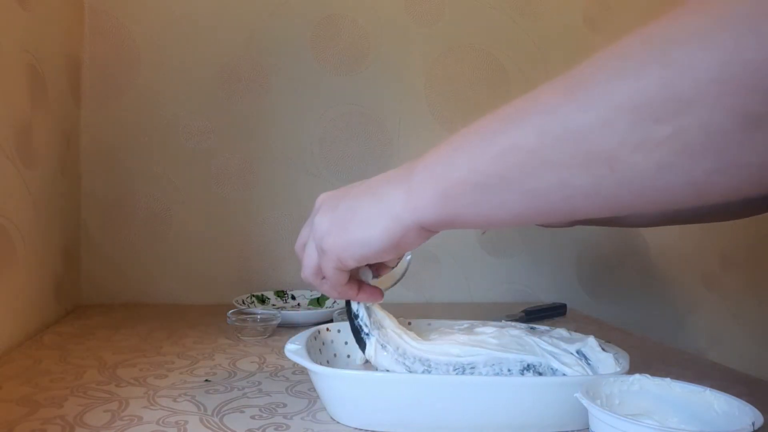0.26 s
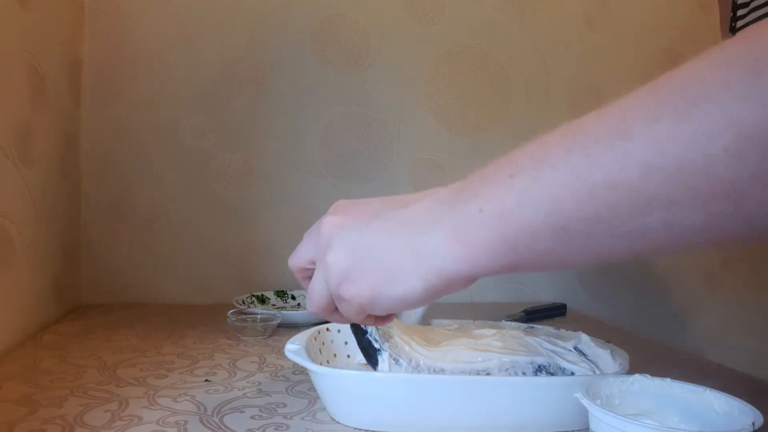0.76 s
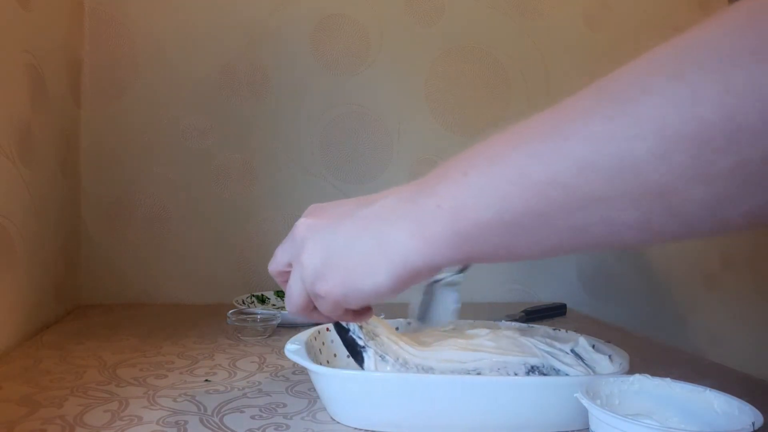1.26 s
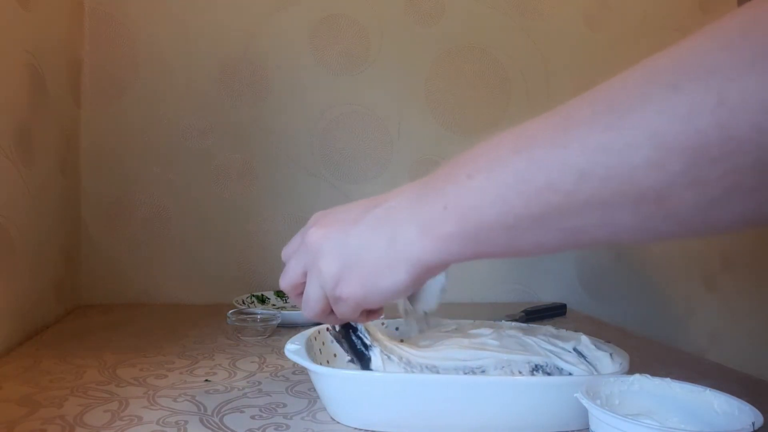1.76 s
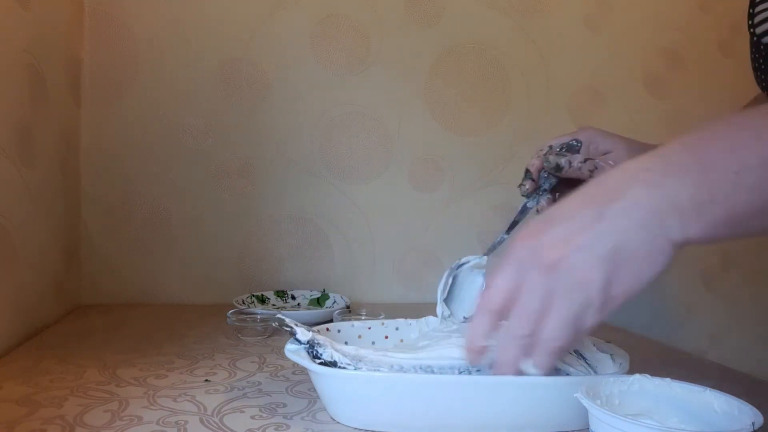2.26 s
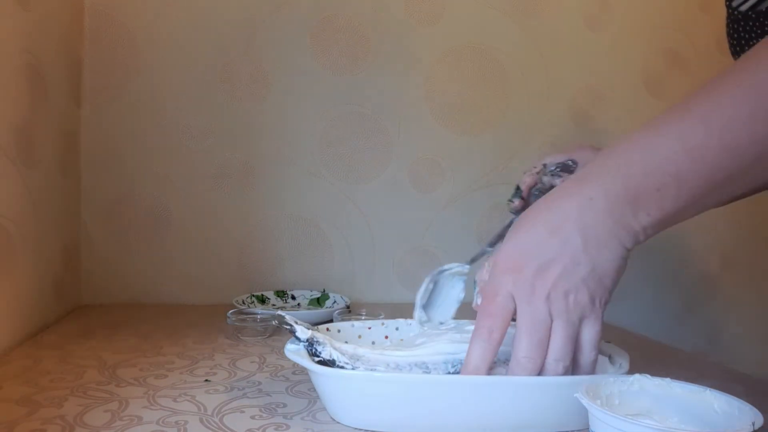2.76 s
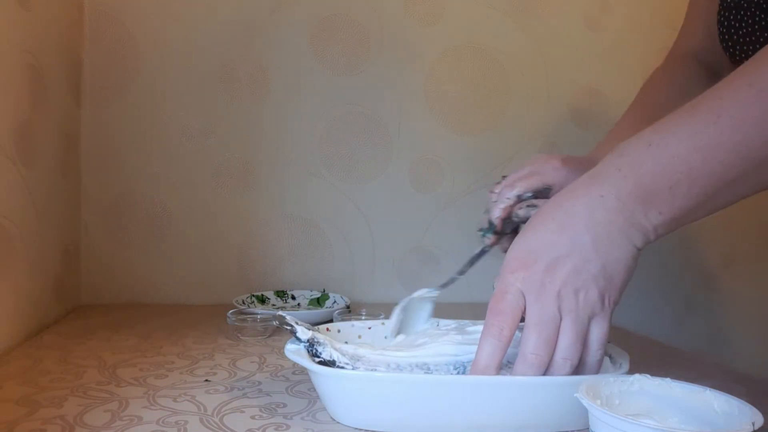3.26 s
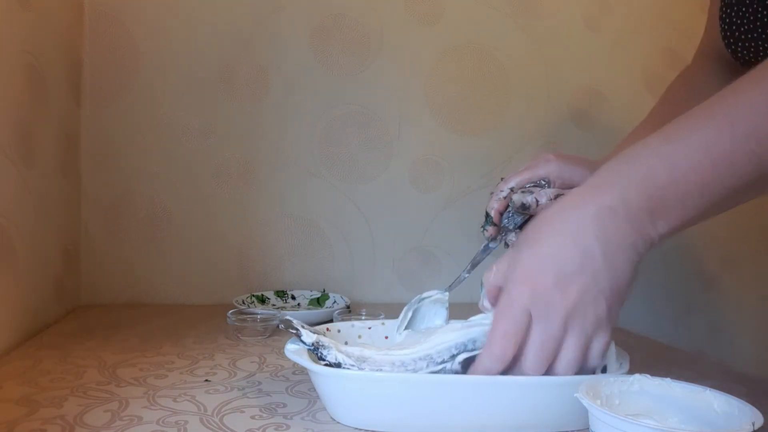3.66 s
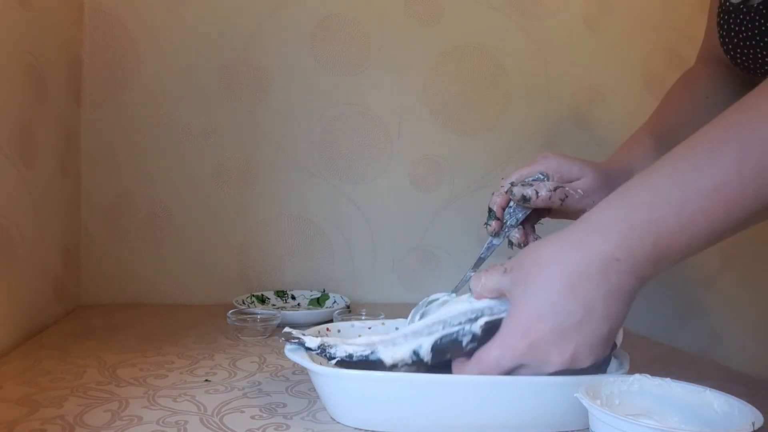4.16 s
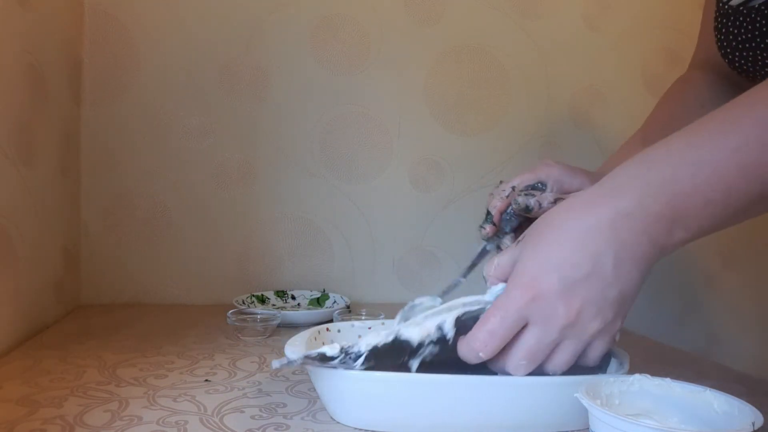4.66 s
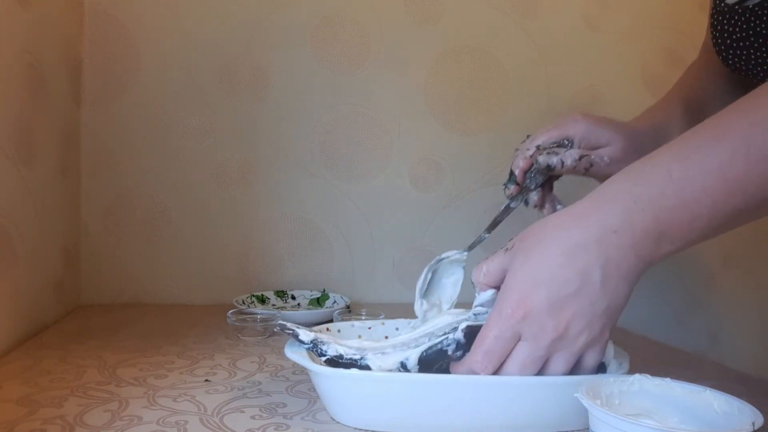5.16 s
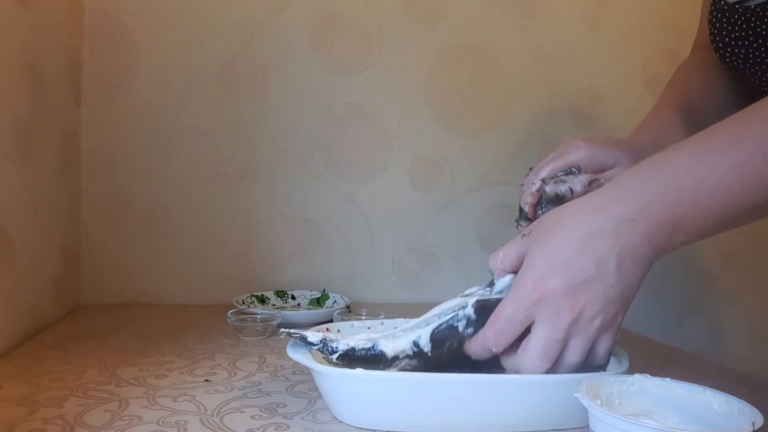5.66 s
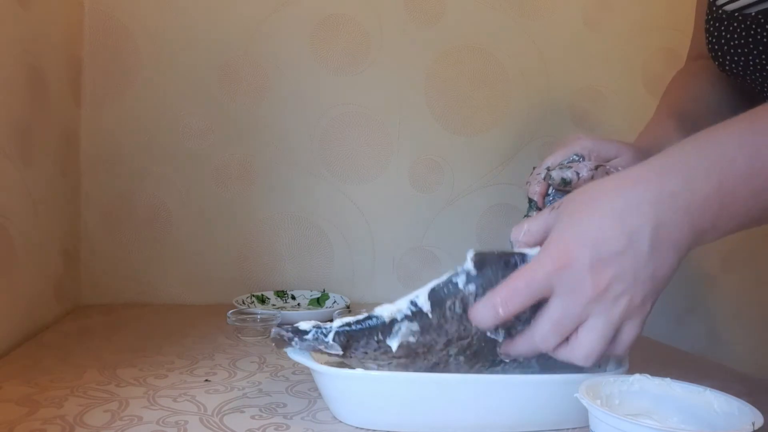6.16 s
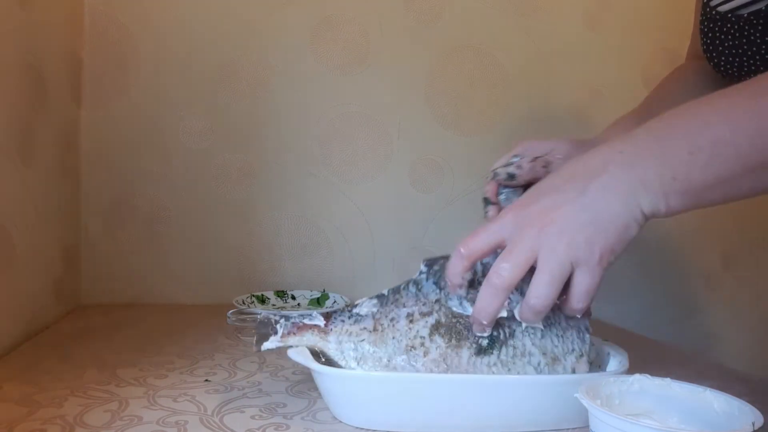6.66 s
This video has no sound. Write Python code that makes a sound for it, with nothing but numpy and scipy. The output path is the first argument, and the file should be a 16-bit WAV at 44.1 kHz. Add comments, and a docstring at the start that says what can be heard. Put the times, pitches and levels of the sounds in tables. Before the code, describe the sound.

Stereo, close microphone on a counter, with short lively room echoes. Quiet fridge hum and a thin whine run throughout. Spoon knocks on thick ceramic come singly with gaps, short and dull-ringing, loudest around the middle and late. Faint sticky smears and soft fleshy bumps fill the gaps, then a brief squeak, a sharp clack, a gritty stick-slip scrape and a final softer knock.

```python
"""Saucing a fish in a ceramic dish

A steel spoon spreads sauce over a fish and knocks the dish: each knock is a tiny blow that sets the dish ringing.
The fish is lifted and turned: soft low thuds, wet smacks made of tiny pops, and a juddering stick-slip scrape.
The spoon squeaks briefly in wavering tones. A small hard-walled kitchen adds echoes to each of these sounds.
Behind it lie shaped noise for the room air and wavering tones for a refrigerator that hums and whines faintly."""
import sys
import numpy as np
from scipy import signal
from scipy.fft import rfft, irfft, next_fast_len
from scipy.io import wavfile
from scipy.ndimage import uniform_filter1d, map_coordinates

SR = 44100
rng = np.random.default_rng(int(sys.argv[2]) if len(sys.argv) > 2 else 0)


def put_to_file(sound):
    """Save the sound as 16-bit audio at rate SR, in the file named by the first command-line argument."""
    columns = np.atleast_2d(sound).T  # one column per channel
    safe = np.clip(columns, -1, 1)
    whole_steps = np.round(safe * 32767)
    wavfile.write(sys.argv[1], SR, whole_steps.astype(np.int16))


N = 304731  # length in samples

# The room
# tone colour of the room air: pitch_hz, level_db
AIR_COLOUR = [(20, -11), (38, -35.5), (50, 0), (120, -5.5), (400, -4.5), (660, -11), (950, -9),
              (1500, -24.5), (2200, -24.5), (2850, -17.5), (3100, -30), (5500, -32.5), (7800, -30.5),
              (8700, -26.5), (10000, -34), (15800, -32)]
# how alike left and right are, in the air and in the echoes: pitch_hz, likeness (1 = identical)
AIR_LIKENESS = [(60, 1), (240, 0.62), (950, -0.037), (3770, -0.093), (15000, -0.12)]
ECHO_LIKENESS = [(100, 1), (300, .75), (700, 0.65), (2000, .15), (8000, 0.26)]
# time for the kitchen's echoes to fall by 60 dB: pitch_hz, decay_s
ECHO_DECAY = [(100, 0.43), (300, 0.47), (700, 0.43), (2000, 0.37), (5000, 0.4), (9000, 0.36), (15000, 0.36)]
# tones of the refrigerator hum: pitch_hz, level_db
HUM_TONES = [(98, -77.5), (146, -71), (199, -75), (247.6, -75), (296, -76), (398.4, -73), (543.7, -77.5),
             (640.6, -84.5), (829, -82.5), (2412, -93.5)]
TOP_HZ = 15800  # nothing above this is kept

# The fish and the sauce
# soft bumps of the fish and hand: start_s, level_db, time_scale_s
SOFT_BUMPS = [(1.422, -49, 0.028), (2.033, -57.5, 0.017), (2.182, -49.5, 0.022), (3.709, -39, 0.02),
              (3.96, -55, 0.071), (5.45, -45.5, 0.058)]
# tone colour of soft flesh: pitch_hz, level_db
FLESH_COLOUR = [(25, -41.5), (45, -15.5), (70, 3.5), (100, -3.5), (140, -3), (300, -8), (600, -17.5),
                (1200, -31.5), (4000, -54.5), (16000, -92)]
# tone colour of the rustling sauce: pitch_hz, level_db
SAUCE_COLOUR = [(290, -34), (500, -11), (549, -16), (676, -16), (832, -6.5), (1160, -7.5), (1950, -18),
                (2330, -10.5), (6000, -42), (7800, -65), (13200, -120)]
# the clearest wet smacks: start_s, level_db, pitch_hz
CLEAR_SMACKS = [(0.658, -72.5, 8040), (1.697, -71, 11000), (1.876, -73, 7200), (2.19, -70, 2020),
                (4.378, -68, 4670), (4.933, -55.5, 1050), (4.964, -72, 9630), (5.783, -65, 6330),
                (6.421, -64.5, 8900)]
SMACK_S, SMACK_OCTAVES = 0.016, 0.45  # time scale and width in pitch of every smack
FAINT_SMACK_DB, FAINT_SMACK_HZ = -81.5, 8000  # middle values of the small smacks that come at random
# slow strokes of the spoon through sauce: start_s, length_s, level_db
SPREAD_STROKES = [(3.92, 0.29, -70.5), (4.39, 0.16, -61.5), (4.58, .3, -67)]
# each stroke sinks in gently, builds up, eases and lifts out
SINK_DB, SINK_S, EASE_DB, LIFT_DB_PER_S = -7, 0.11, 7, 112

# The spoon and the dish
# the spoon's edge catches and squeaks: start_s, level_db, time_scale_s
SPOON_SQUEAKS = [(5.3849, -28.5, 0.0057), (5.431, -42.5, 0.0044)]
# tones of the squeak: pitch_hz, level_db
SPOON_TONES = [(1020, -7.5), (1420, -11.5), (2530, -2), (3700, -23.5)]
# pushes that scrape along the ceramic: start_s, length_s, level_db
SCRAPE_PUSHES = [(5.997, 0.15, -53.5), (6.088, 0.11, -23), (6.201, 0.03, -28.5), (6.357, 0.069, -43.5)]
# each push bites below its full force, builds up, slackens and lets go
BITE_DB, BUILD_S, SLACKEN_DB, LET_GO_DB_PER_S = -9, 0.045, 12, 380
CATCH_DB = 13.5  # the click as the edge catches, over the level of its push
# low push on the counter, relative to each kind of stroke
SCRAPE_RUMBLE_DB, SPREAD_RUMBLE_DB = -27.5, 1
# ringing modes of the dish, and how strongly each kind of contact drives them:
# pitch_hz, width_hz, end_db, wall_db, corner_db, rim_db, floor_db, scrape_db
DISH_MODES = [(124, 54, -26, -10.5, -8, -16.5, -12, -19.5), (280, 120, -29, -14, -5.5, -21.5, -6.5, -19.5),
              (331, 51, -18.5, -4.5, -6, -11.5, -3, -12.5), (441, 41, -12, -0.5, -8, -4.5, -8, -10.5),
              (619, 76, -18.5, -2, -7, -37.5, -13, -33.5), (795, 60, -23, 0, -1.5, -27, -6, -11),
              (942, 120, -10, -7.5, -9.5, -6, -5.5, -5), (1080, 65, -17, -9, -10, -1, -4.5, -27),
              (1197, 110, -15.5, -9.5, -5, -6, -31, -6), (1416, 110, -2, -3, -2.5, -8, -22, -6.5),
              (1609, 110, -8.5, -1, 0.5, -10, -5, 1.5), (1841, 57, -18, 1, -2, -13.5, -6.5, -26),
              (2018, 87, -10.5, 2.5, 3, -12, -5.5, -9.5), (2298, 80, -5.5, -9, -7.5, -9, -26.5, -31.5),
              (2485, 99, -38, -16.5, -12, -14, 0, -7.5), (2730, 250, -15, -10, -6.5, -16.5, -12, -19),
              (3097, 130, -38, -11, -9.5, -38.5, -6.5, -11.5),
              (3390, 150, -29, -26.5, -13, -28.5, -9.5, -26), (3645, 210, -15, -20, -24, -14, -16, -25.5),
              (4235, 260, -23, -21.5, -21, -18.5, -20, -27),
              (4890, 130, -30, -20, -17.5, -46.5, -16.5, -49),
              (5536, 200, -27.5, -16, -33, -52.5, -19, -32), (6020, 600, -26, -46, -31.5, -27, -38, -39),
              (7040, 300, -28.5, -31, -25.5, -19.5, -22, -47), (8160, 1200, -28.5, -52, -30, -31, -34, -37),
              (9850, 550, -37, -34, -52, -38, -36, -48), (12400, 6200, -59, -54, -44.5, -34.5, -37.5, -58)]
# names of the contacts, in the order of the last six columns above: name
CONTACT_NAMES = ["end", "wall", "corner", "rim", "floor", "scrape"]
# one row for each contact name: direct_db (early arrivals against the echoes),
# thud_db (push into the counter, relative to the knock)
CONTACT_LEVELS = [(1.5, -52), (-6.5, -54), (-7.5, -51), (-3.5, -47), (4.5, -47), (9, -37)]
# knocks on the dish: start_s, level_db, brightness_db_per_octave, contact_name
DISH_KNOCKS = [(1.0282, -4, -6, "end"), (1.0615, -8.5, -8.5, "end"), (1.2981, -1.5, -2, "end"),
               (3.0576, 11, 1.5, "wall"), (3.500, 5, 0.7, "corner"), (4.173, -19.5, -7, "corner"),
               (5.2696, 0, 0, "rim"), (5.5361, 12, -0.5, "floor"), (5.838, -21.5, -9, "floor"),
               (5.958, -19.5, -9, "floor"), (6.403, -10, -4.5, "scrape"), (6.901, -3.5, -6, "end")]
DISH_PAN_DB = 2.5  # early sound of each knock is a little louder on the left
# after a blow the edge chatters on the glaze, the more the lighter the knock
CHATTER_DB, CHATTER_DB_PER_DB, CHATTER_S = -5, -0.34, 0.003


def amp(db):
    """Turn decibels into gain."""
    return 10 ** (np.asarray(db) / 20)


def unit(x):
    """Scale to an average (rms) level of 1."""
    return x / np.sqrt(np.mean(x ** 2) + 1e-20)


def along(points, hz):
    """Read between (pitch, value) points on a log pitch axis."""
    f, v = np.transpose(points)
    return np.interp(np.log(hz + 1), np.log(np.abs(f) + 1), v)


def wobble(rate, size=16):
    """A smooth random curve through `rate` random points a second."""
    coarse = np.arange(0, N, size)
    points = rng.standard_normal(int(N * rate / SR) + 4)
    curve = map_coordinates(points, [coarse * rate / SR])
    return np.interp(np.arange(N), coarse, curve)


def filtered(x, response):
    """Change the strength of each frequency by a given response."""
    n = x.shape[-1]
    m = next_fast_len(n + SR // 4)
    hz = np.fft.rfftfreq(m, 1 / SR)
    return irfft(rfft(x, m) * response(hz), m)[..., :n]


def noise_pair(n, alike):
    """Left and right noise whose likeness depends on frequency."""
    def mix(hz):
        turn = np.arccos(np.clip(along(alike, hz), -1, 1)) / 2
        return np.array([np.cos(turn), np.sin(turn)])

    mid, side = filtered(rng.standard_normal((2, n)), mix)
    return np.array([mid + side, mid - side])


def add(track, s, sound):
    """Mix a sound into the track at time s."""
    part = track[..., round(s * SR):][..., :sound.shape[-1]]
    part += sound[..., :part.shape[-1]]


def swell(length):
    """A quick rise to 1 at half the time scale (in seconds), then a longer fall."""
    u = np.arange(SR // 3) / SR / max(length, 1e-3)
    return 2 * u * np.exp(1 - 2 * u)


def causal(gain):
    """The most prompt impulse response that has this gain at each frequency."""
    cepstrum = irfft(np.log(gain + 1e-9))
    cepstrum[1:] *= 2
    return irfft(np.exp(rfft(cepstrum[:len(gain) - 1], len(cepstrum))))


def dispersion(delay, size=2048, count=25):
    """A click whose frequencies arrive after different random delays, up to about delay seconds."""
    hz = np.fft.rfftfreq(size, 1 / SR)
    lag = np.interp(hz, np.linspace(0, SR / 2, count), rng.uniform(0, delay, count))
    turns = np.cumsum(lag) * SR / size
    return irfft(np.exp(-2j * np.pi * turns))[:size // 2]


def uncoloured(response, size=32768, count=75):
    """Even out the echoes: they keep their fine ripple but favour no band."""
    power = np.mean(np.abs(rfft(response, size)) ** 2, axis=0)
    smooth_power = uniform_filter1d(power, count)
    correction = causal(1 / np.sqrt(np.abs(smooth_power) + 1e-12))[:size // 8]
    return signal.fftconvolve(response, correction[None], axes=1)


def kitchen(x, pan_db=2, direct_db=0, early_db=0, tail_db=2.5, early_t60=0.14,
            build=0.0081, port_delay=0.00042, bounce_db=-5):
    """Direct sound, bounces off the counter and back wall, quick corner echoes, then the diffuse tail."""
    n = SR * 2 // 3
    t = np.arange(n) / SR
    # the tail builds up over `build` seconds, then each band dies at its own pace
    hz, frames, bands = signal.stft(noise_pair(n, ECHO_LIKENESS), SR, nperseg=256)
    fading = bands * amp(-60 * frames / along(ECHO_DECAY, hz)[:, None])
    tail = signal.istft(fading, SR, nperseg=256)[1][:, :n]
    tail = unit(tail * (1 - np.exp(-t / build))) / np.sqrt(n)
    quick_echoes = noise_pair(n, ECHO_LIKENESS) * amp(-60 * t / early_t60)
    near = amp(early_db) * unit(quick_echoes) / np.sqrt(n)
    counter_s, wall_s = rng.uniform(0.00092, 0.0025), rng.uniform(0.003, 0.005)
    for s, db in [(0, 0), (counter_s, bounce_db), (wall_s, bounce_db)]:
        # each arrival is smeared differently on the left and right
        arrival = np.array([dispersion(port_delay), dispersion(port_delay)])
        add(near, s, amp(direct_db + db) * arrival)
    response = near * amp([[pan_db / 2], [-pan_db / 2]]) + amp(tail_db) * tail
    return signal.fftconvolve(x[None], uncoloured(response), axes=1)[:, :N]


def ring(modes, tilt_db=0, size=8192):
    """Ringing of energy 1: each (pitch, width, level) mode is a peak, and a wider one dies faster."""
    hz = np.fft.rfftfreq(size, 1 / SR) + 1
    power = sum(amp(db) ** 2 / (1 + ((hz ** 2 - c ** 2) / (hz * w)) ** 2) ** 1.27
                for c, w, db in modes)
    brightness = amp(tilt_db * np.log2(1 + hz / 1500))
    response = causal(np.sqrt(power) * brightness)
    return response / np.linalg.norm(response)


def dish(place):
    """The modes of the dish as driven by one kind of contact."""
    column = CONTACT_NAMES.index(place)
    return [(hz, width, drive[column]) for hz, width, *drive in DISH_MODES]


def strokes(rows, start_db, attack, sag_db, release_db_per_s):
    """Force of hand strokes: each starts low, builds up, sags and dies away."""
    gain = np.zeros(N)
    for s, length, db in rows:
        t = np.arange(N) / SR - s
        rise = start_db * np.clip(1 - t / attack, 0, 1)
        sag = sag_db * np.clip((t - attack) / max(length - attack, attack), 0, 1)
        release = release_db_per_s * np.maximum(t - length, 0)
        gain += (t >= 0) * amp(db + rise - sag - release)
    return gain


def spreading():
    """Force of the strokes through the sauce."""
    return strokes(SPREAD_STROKES, SINK_DB, SINK_S, EASE_DB, LIFT_DB_PER_S)


def scraping():
    """Force of the pushes along the ceramic."""
    return strokes(SCRAPE_PUSHES, BITE_DB, BUILD_S, SLACKEN_DB, LET_GO_DB_PER_S)


def background(air_db=-65, whine_hz=2800, whine_db=-81, motor_hz=49.8, throb=0.49,
               drift=1.0, fade_db_per_s=0.8):
    """Room air, unsteady refrigerator hum and a fading whine that throbs at each turn of its motor."""
    t = np.arange(N) / SR
    air = unit(filtered(noise_pair(N, AIR_LIKENESS), lambda hz: amp(along(AIR_COLOUR, hz))))
    air = amp(air_db + 1.1 * wobble(11)) * air
    hum = np.zeros(N)
    for hz, db in HUM_TONES:
        level = amp(db + 1.7 * wobble(3.3)) * np.sqrt(2)
        hum += level * np.sin(2 * np.pi * hz * t + 0.5 * wobble(1.4))
    # left and right whines drift separately
    tone = np.array([np.sin(2 * np.pi * whine_hz * t + drift * wobble(30)) * amp(2.1 * wobble(4.0))
                     for side in range(2)])
    whine = unit(tone * (1 + throb * np.sin(2 * np.pi * motor_hz * t + 0.4 * wobble(30))))
    fade = amp(whine_db - fade_db_per_s * (t - t.mean()))  # whine_db holds halfway through
    return (air + hum + fade * whine) * amp([[1.5], [-1.5]])


def thuds(jolt_s=0.023):
    """Soft flesh pushes slowly on dish and counter, so mostly low sound results; knocks and strokes push too."""
    push = amp(SCRAPE_RUMBLE_DB) * scraping() + amp(SPREAD_RUMBLE_DB) * spreading()
    for s, db, length in SOFT_BUMPS:
        add(push, s, amp(db) * swell(length))
    for s, db, _, place in DISH_KNOCKS:
        _, thud_db = CONTACT_LEVELS[CONTACT_NAMES.index(place)]
        add(push, s, amp(db + thud_db) * swell(jolt_s))
    body = unit(filtered(rng.standard_normal(N), lambda hz: amp(along(FLESH_COLOUR, hz))))
    return kitchen(push * body, tail_db=-1.5)


def crackle(n, spiky=0.7):
    """Noise with uneven spikes, like many tiny pops."""
    return rng.standard_normal(n) * np.exp(spiky * rng.standard_normal(n))


def sauce(spread_db=-2, scatter_db=3, count=14):
    """Sticky films tear in clusters of tiny pops; the sliding spoon makes a soft wet rustle."""
    rustle = unit(filtered(crackle(N), lambda hz: amp(along(SAUCE_COLOUR, hz))))
    out = amp(spread_db) * spreading() * rustle
    faint = [(when * N / SR,
              FAINT_SMACK_DB + scatter_db * (2 * force - 1),
              FAINT_SMACK_HZ * 2 ** (high - 0.5))
             for when, force, high in rng.random((count, 3))]
    shape = swell(SMACK_S)
    for s, db, pitch in CLEAR_SMACKS + faint:
        def band(hz):
            octaves_away = np.log2((hz + 1) / pitch)
            return 1 / (1 + (octaves_away / SMACK_OCTAVES) ** 2) ** 2

        pops = filtered(crackle(len(shape)), band)
        add(out, s, amp(db) * shape * unit(pops))
    return kitchen(out)


def squeaks(waver=0.55, rasp_db=-23):
    """Brief friction sets the spoon singing in wavering tones over a little rasp."""
    grip = np.zeros(N)
    for s, db, length in SPOON_SQUEAKS:
        add(grip, s, amp(db) * swell(length))
    t = np.arange(N) / SR
    tones = sum(amp(db) * np.sin(2 * np.pi * hz * t + waver * wobble(500)) for hz, db in SPOON_TONES)
    rasp = signal.fftconvolve(rng.standard_normal(N), ring(dish("rim")))[:N]
    return kitchen(grip * (unit(tones) + amp(rasp_db) * rasp), pan_db=0.0, direct_db=6.0)


def scrape(slip_rate=230, uneven=0.45, scatter_db=4, grit=0.19, travel=0.0013,
           dip_hz=690, dip_width_hz=130, dip_db=-9, soft_hz=12000):
    """Stick and slip: a catch, uneven tiny blows and fine grit drive the dish."""
    rate = slip_rate * np.exp(uneven * wobble(200))  # slips a second
    slips = np.diff(np.floor(np.cumsum(rate) / SR), prepend=0)
    # the longer the contact sticks, the harder it lets go
    slips = slips * amp(scatter_db * rng.standard_normal(N)) / np.sqrt(rate)
    force = (unit(slips) + grit * rng.standard_normal(N)) * scraping()
    for s, _, db in SCRAPE_PUSHES:
        force[round(s * SR)] += amp(db + CATCH_DB)

    def colour(hz):
        # the dish answers less between its low and middle modes; the top is softened
        dip = amp(dip_db * np.exp(-((hz - dip_hz) / dip_width_hz) ** 2))
        return dip / np.hypot(1, (hz / soft_hz) ** 2)

    body = signal.fftconvolve(dispersion(travel), ring(dish("scrape")))
    return kitchen(signal.fftconvolve(filtered(force, colour), body)[:N], pan_db=3.5)


def knocks(touch_db=-27, lead=0.0013, travel=0.0022):
    """The spoon brushes the sauce film, then blow and chatter spread through the dish as bending waves."""
    out = np.zeros((2, N))
    n = round(lead * SR)  # samples of brushing before the blow
    for s, db, tilt_db, place in DISH_KNOCKS:
        direct_db, _ = CONTACT_LEVELS[CONTACT_NAMES.index(place)]
        touch = amp(touch_db) * rng.standard_normal(n) / np.sqrt(n)
        force = dispersion(travel)
        chatter = rng.standard_normal(len(force)) * swell(CHATTER_S)[:len(force)]
        chatter_gain = amp(CHATTER_DB + CHATTER_DB_PER_DB * db)
        force = force + chatter_gain * chatter / np.linalg.norm(chatter)
        contact = np.append(touch, force / np.linalg.norm(force))
        blow = signal.fftconvolve(contact, ring(dish(place), tilt_db))
        # start early by the brushing and the middle of the wave delays
        add(out, s - (n / SR + travel / 2), amp(db) * kitchen(blow, DISH_PAN_DB, direct_db))
    return out


def scene():
    """Everything on the counter, over the kitchen's background."""
    return background() + thuds() + sauce() + squeaks() + scrape() + knocks()


def record(dry):
    """Keep only the sound below the top frequency."""
    return filtered(dry, lambda hz: hz < TOP_HZ)


dry = scene()
out = record(dry)
put_to_file(out)
```